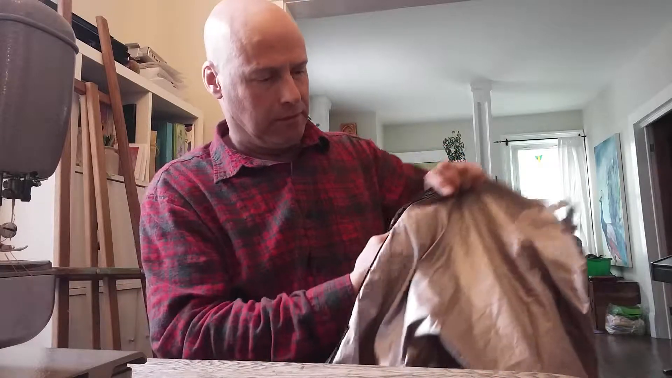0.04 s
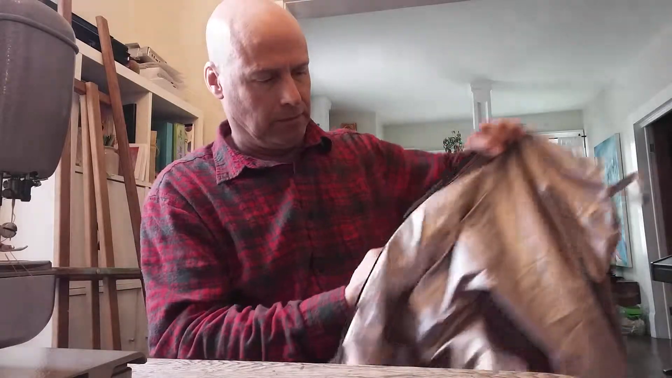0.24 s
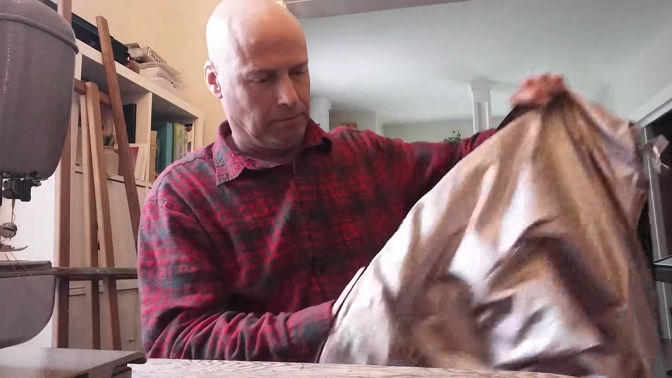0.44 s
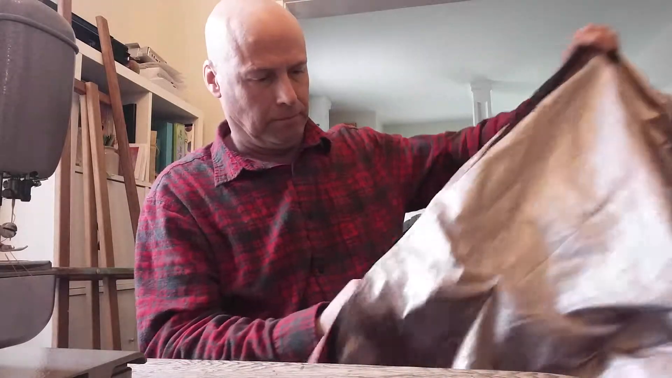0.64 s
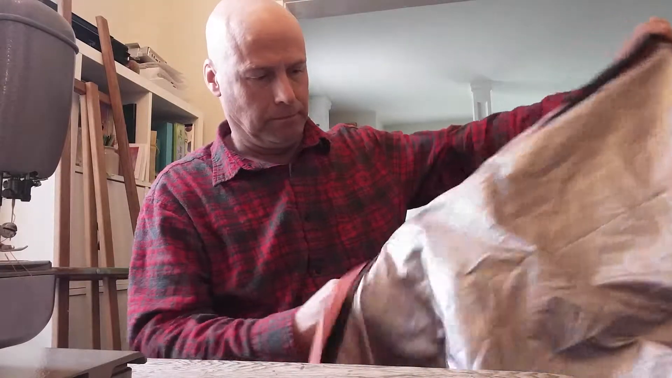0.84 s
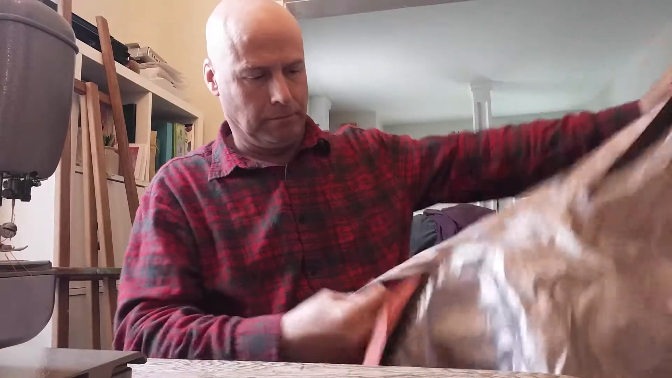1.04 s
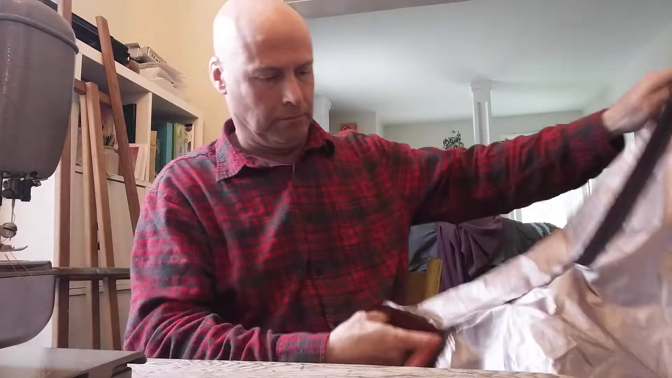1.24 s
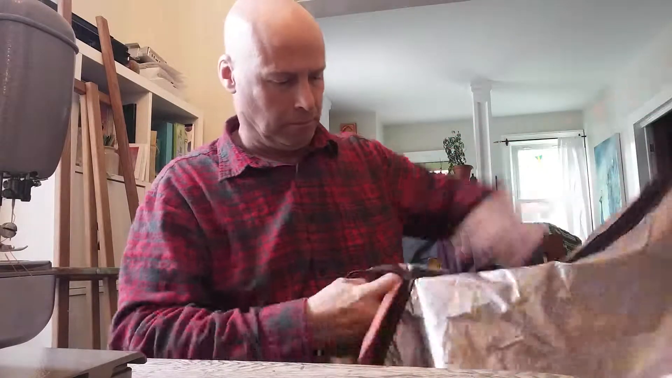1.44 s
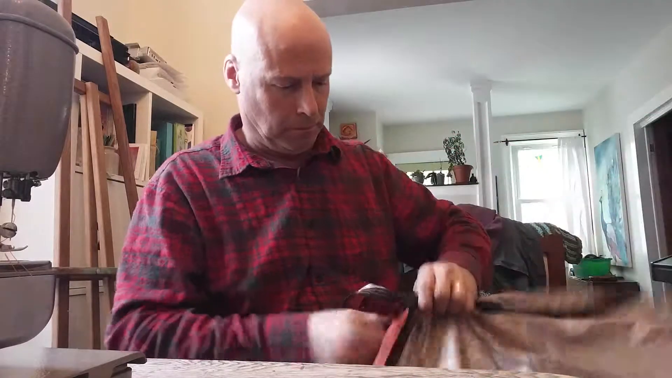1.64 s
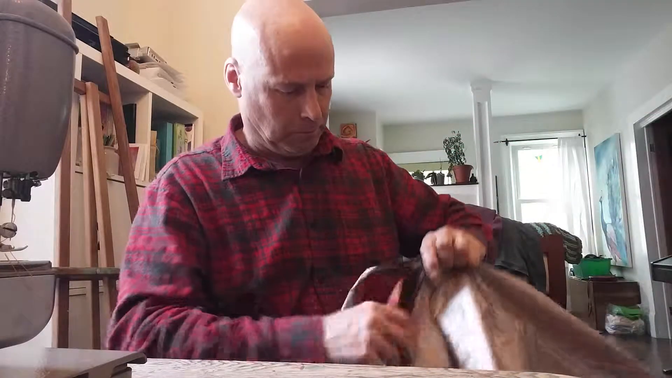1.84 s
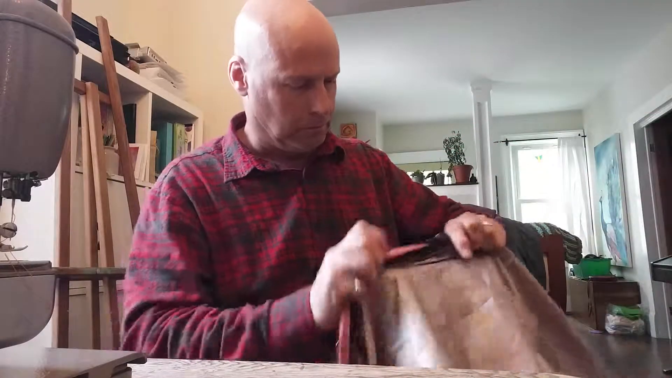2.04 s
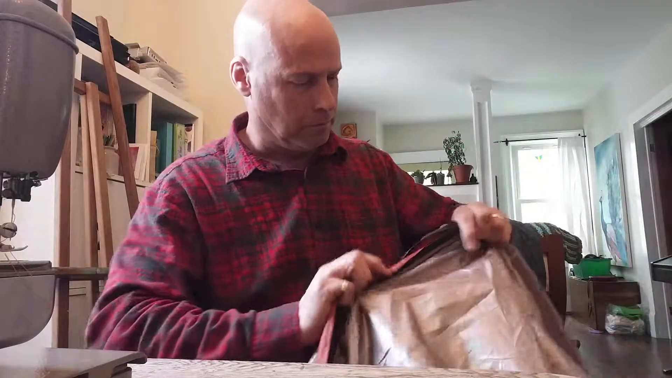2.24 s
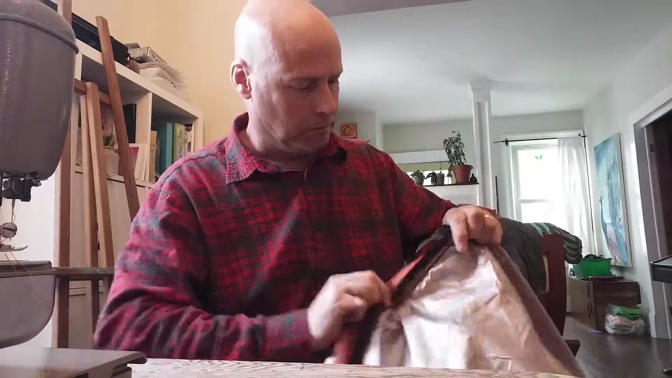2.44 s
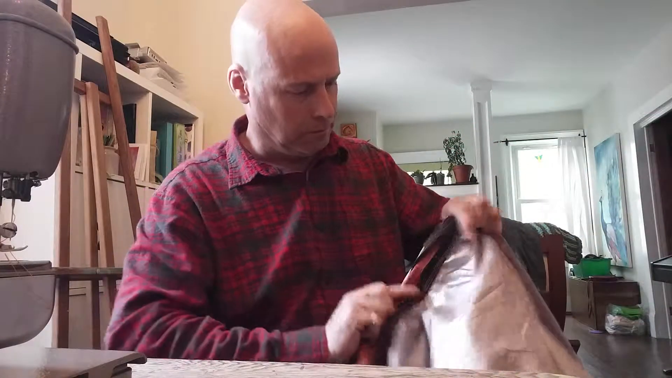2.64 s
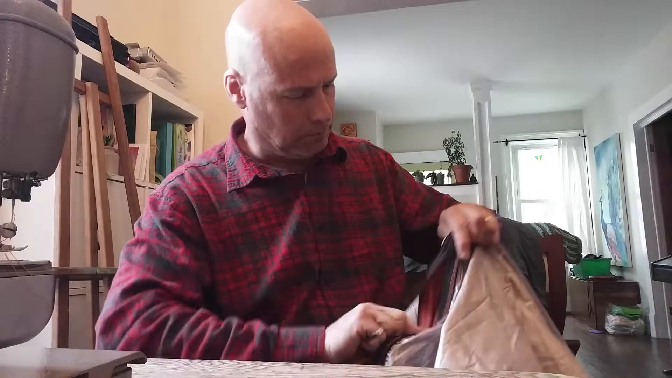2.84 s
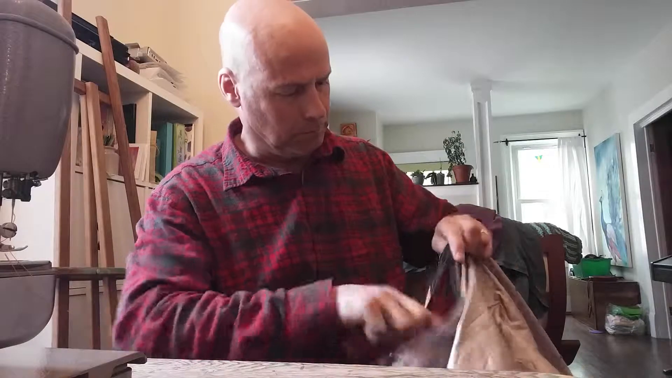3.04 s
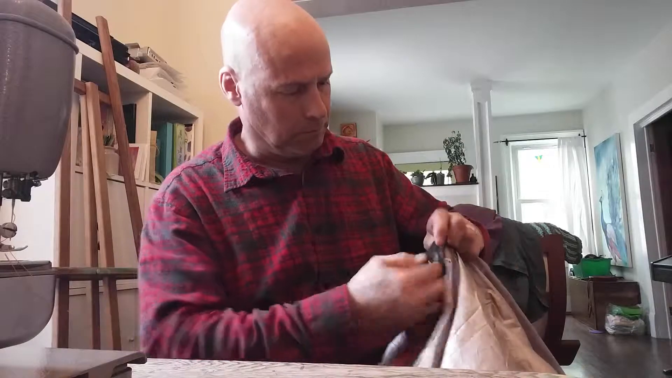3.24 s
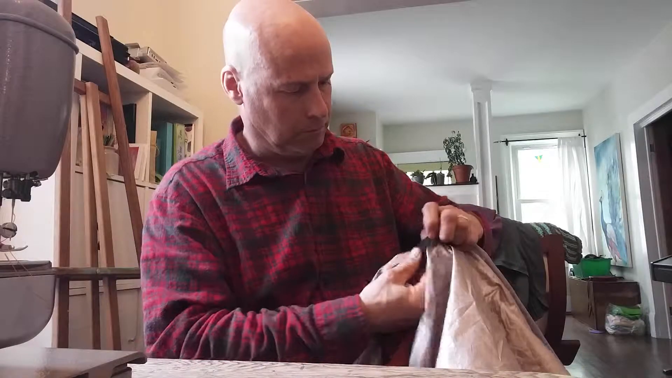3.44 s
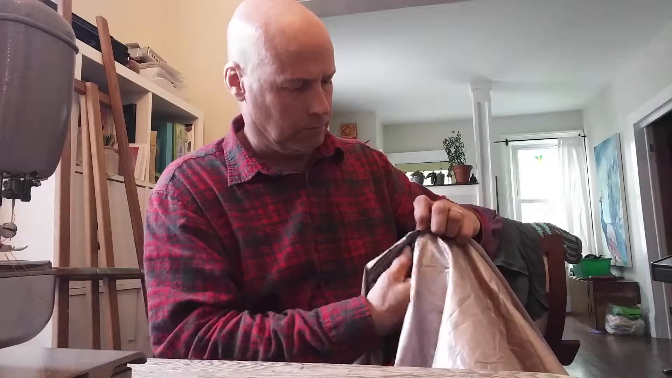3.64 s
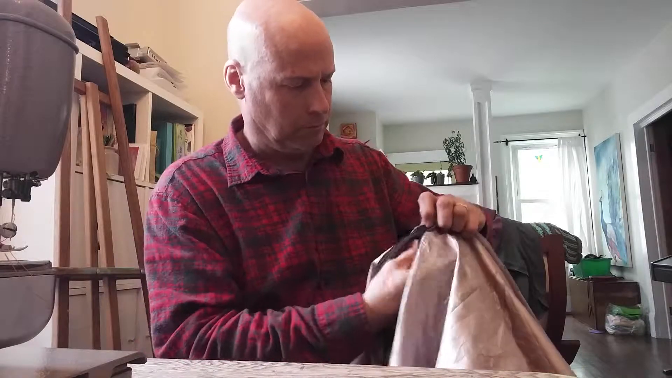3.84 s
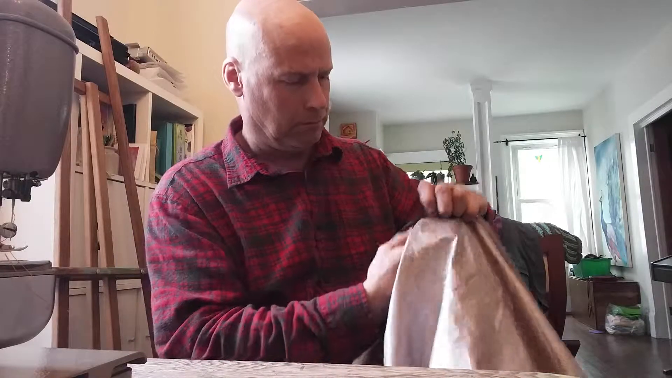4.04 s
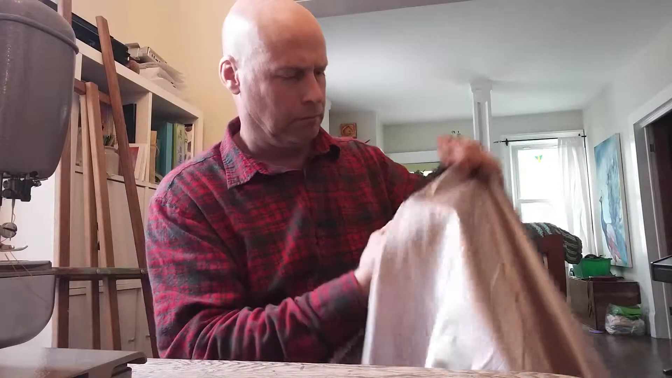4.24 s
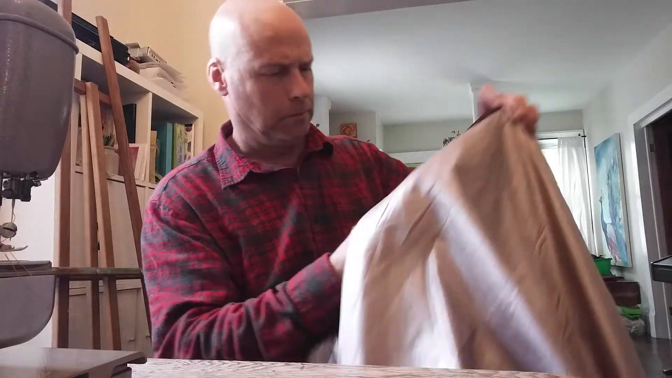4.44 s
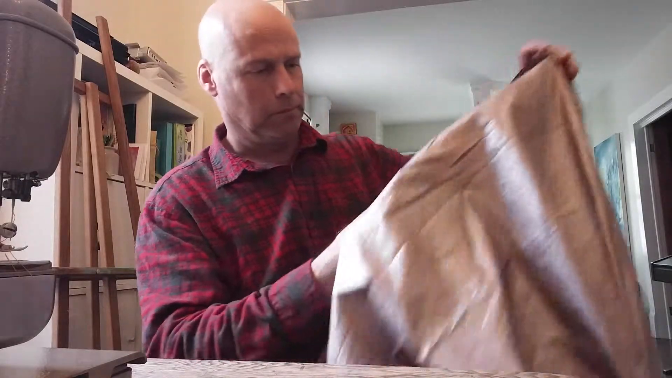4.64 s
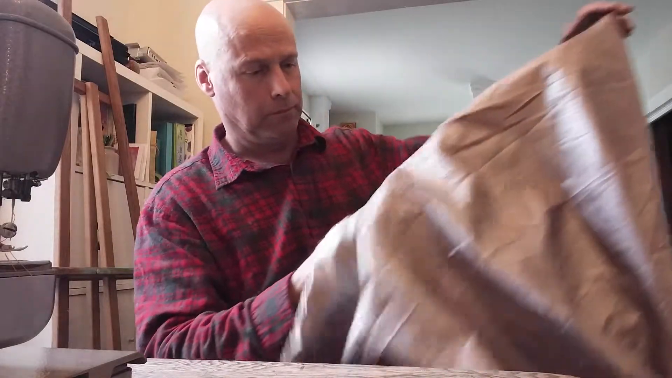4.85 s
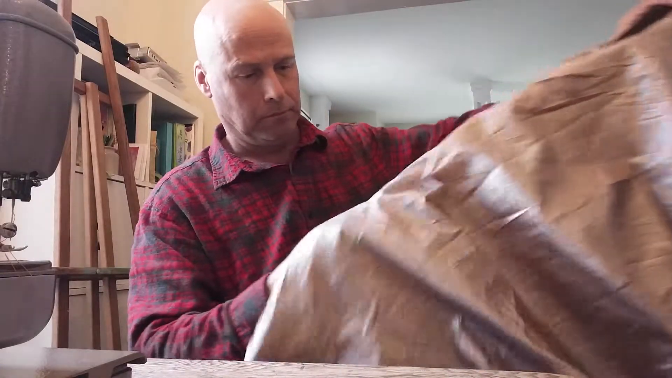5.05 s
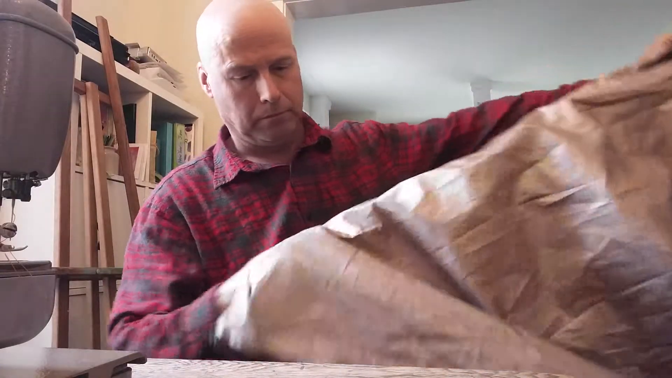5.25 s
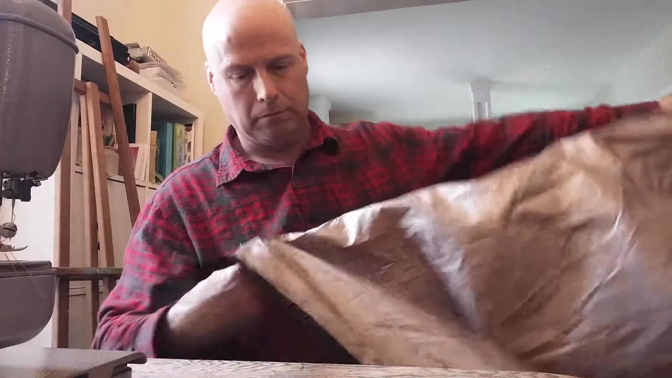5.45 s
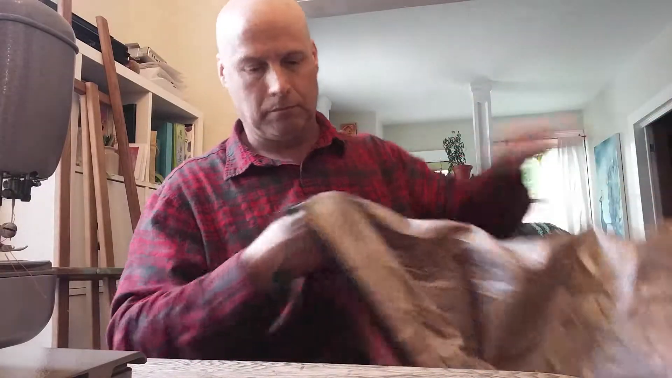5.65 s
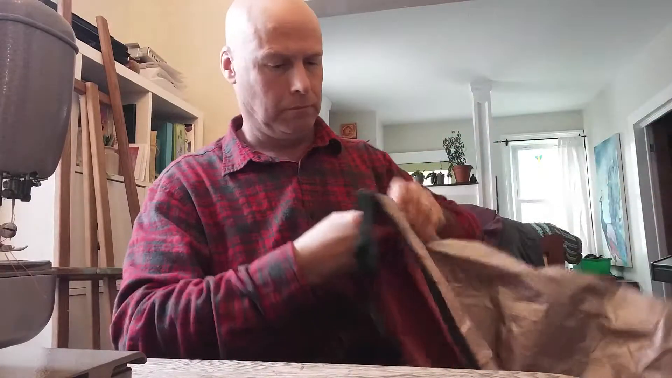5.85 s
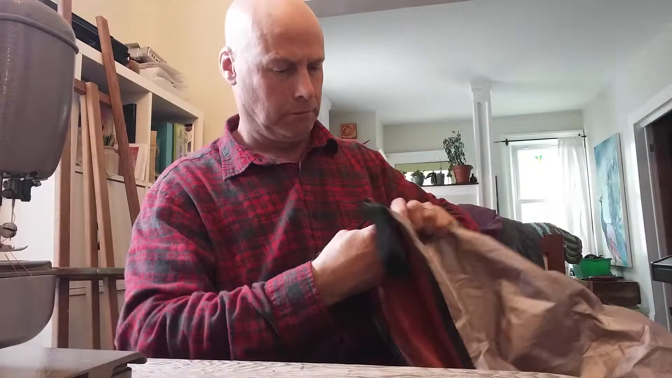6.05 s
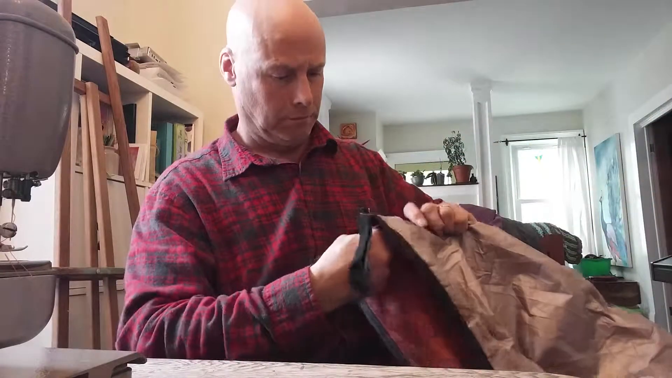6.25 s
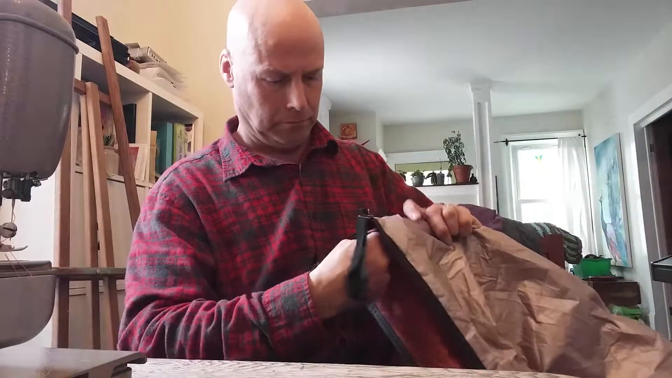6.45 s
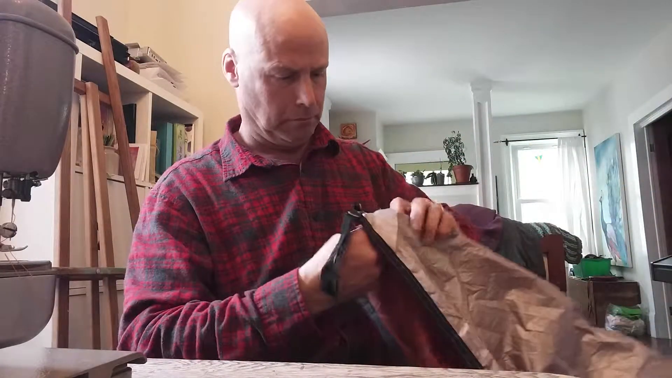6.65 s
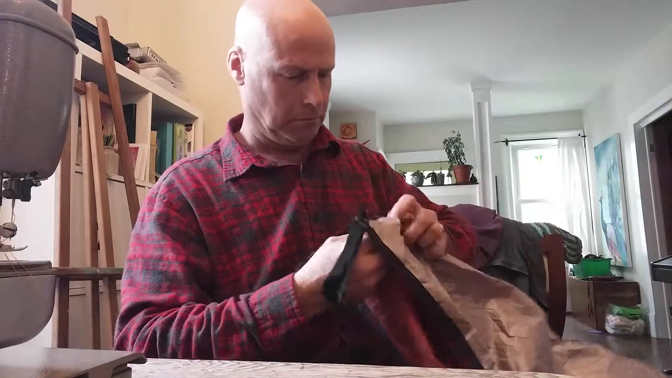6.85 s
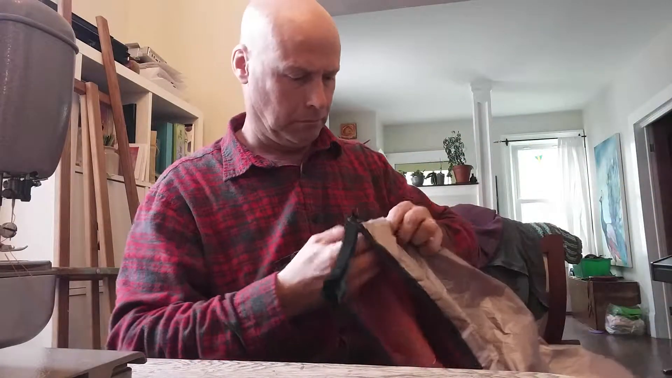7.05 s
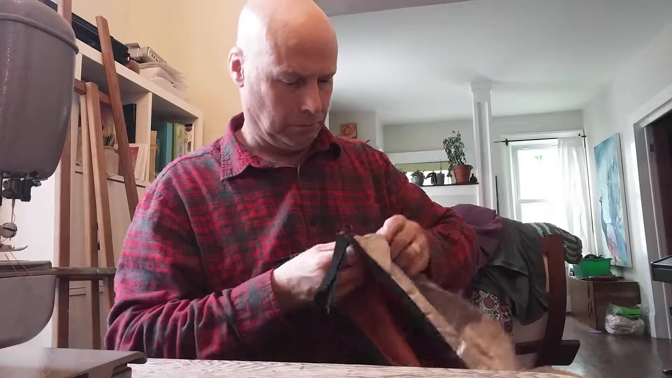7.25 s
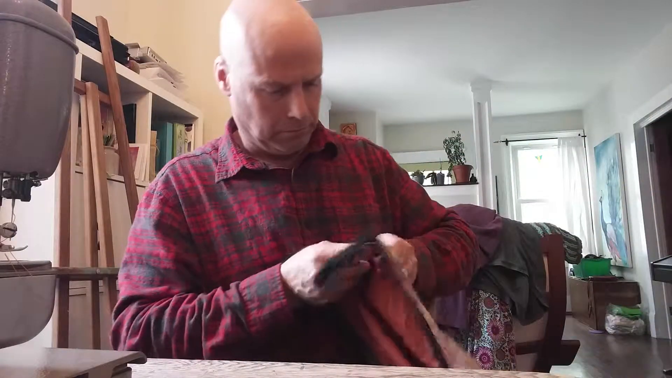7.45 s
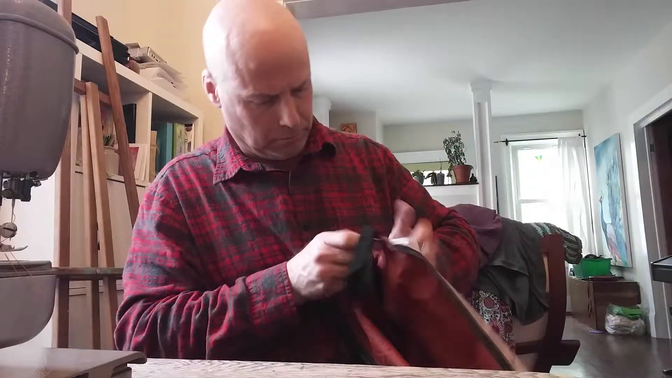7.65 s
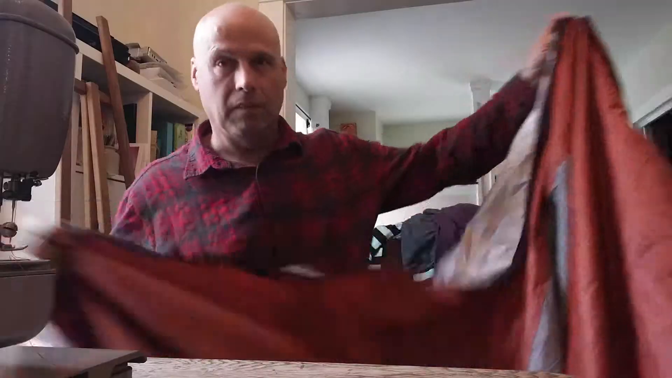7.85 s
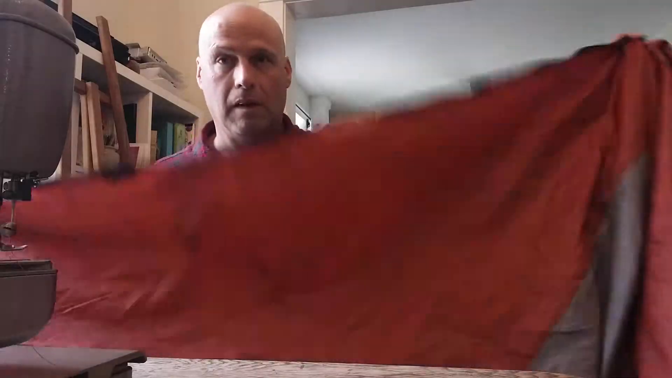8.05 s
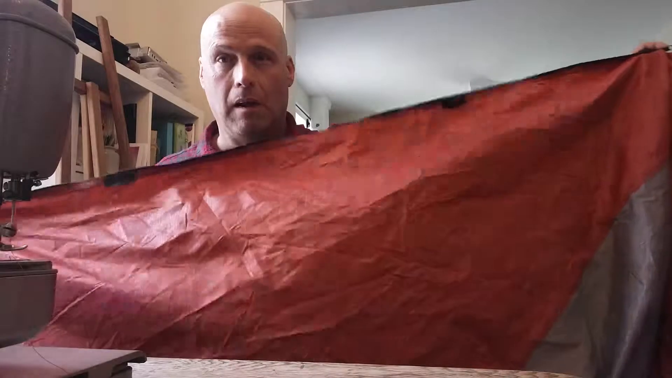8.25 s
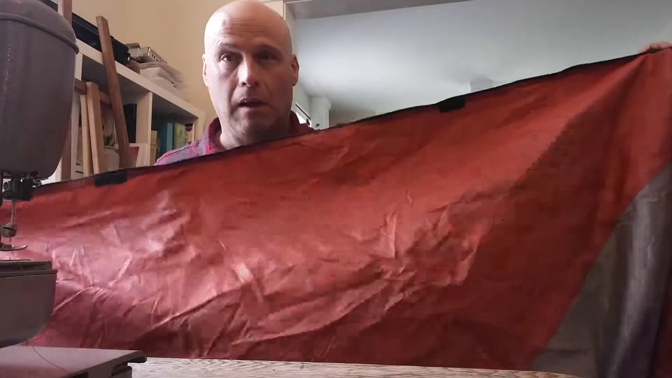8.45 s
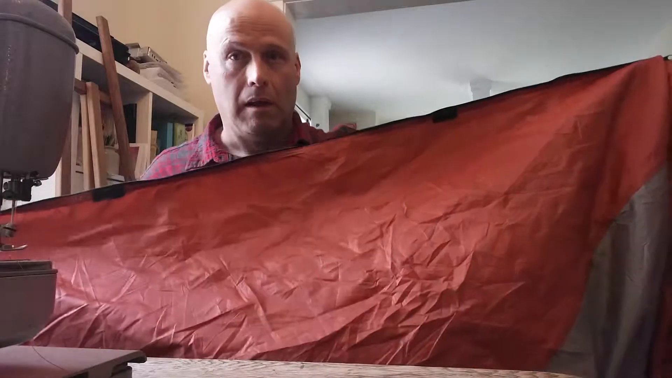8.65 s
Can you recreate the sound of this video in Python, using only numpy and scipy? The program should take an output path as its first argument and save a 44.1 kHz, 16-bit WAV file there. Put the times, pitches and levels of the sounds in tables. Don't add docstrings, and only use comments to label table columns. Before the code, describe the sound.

Stiff coated tent fabric is handled very near a stereo microphone indoors. A quick raspy zip runs through the cloth, followed by crisp folding, low soft knocks and puffs of air. Another zip starts lower, speeds up and slows, with loud ticks and fabric snaps. Smaller rustles follow, then sudden silence and a quiet return with a few tiny ticks.

```python
import sys
import numpy as np
from scipy import signal
from scipy.fft import rfft, irfft, next_fast_len
from scipy.io import wavfile
from scipy.ndimage import uniform_filter1d

SR = 44100
rng = np.random.default_rng(int(sys.argv[2]) if len(sys.argv) > 2 else 0)


def gain_from_db(level_db):
    decades = np.asarray(level_db, float) / 20
    return 10 ** decades


def file_out(sig):
    cols = np.atleast_2d(sig).T
    lim = np.clip(cols, -1, 1)
    pcm = np.round(lim * 32767).astype(np.int16)
    wavfile.write(sys.argv[1], SR, pcm)


N = 383669
FULL_DB = -38


def zipper_pulls():
    # (time [s], tooth rate [Hz], octave [dB], fundamental [dB], third partial [dB])
    first_pull = [
        [(0.17, 408.5, -64, -42, -54), (0.206, 385, -52, -48.5, -64), (0.238, 349.3, -55, -45.5, -63),
         (0.274, 402, -49.5, -67.5, -72), (0.29, 404, -55, -45, -71.5), (0.314, 395.4, -53, -46.5, -65),
         (0.342, 412, -46.5, -51.5, -59.5), (0.392, 317, -48.5, -72.5, -44.5), (0.4, 327, -44, -60.5, -48)],
        [(0.4, 341.3, -34, -67.5, -58), (0.418, 373.7, -39, -45.5, -45.5), (0.466, 428, -34, -44, -36),
         (0.516, 430, -35, -36, -49), (0.55, 394.3, -41.5, -56.5, -43), (0.616, 402.3, -32.5, -47.5, -51),
         (0.66, 391.7, -40, -36.5, -55.5), (0.678, 445, -30, -40.5, -39.5), (0.7, 526, -32, -55.5, -45.5)],
        [(0.7, 540, -35.5, -47.5, -48.5), (0.728, 562.3, -30, -34, -43), (0.756, 574.3, -38.5, -36.5, -39.5),
         (0.776, 508, -46, -57, -40.5), (0.79, 464.3, -35, -46.5, -34.5), (0.812, 461.5, -36.5, -36.5, -40),
         (0.88, 367.3, -32.5, -60, -44), (0.92, 319.8, -37.5, -49.5, -40.5), (0.95, 335.2, -41.5, -37.5, -42.5)],
        [(0.95, 342.4, -42, -35, -40.5), (0.974, 348.2, -38.5, -65, -48), (0.998, 347.7, -26, -58, -38.5),
         (1.022, 330, -37, -61, -36.5), (1.044, 340.4, -36, -59.5, -44.5), (1.082, 454, -33.5, -44, -49.5),
         (1.114, 350.8, -50, -45.5, -50.5), (1.15, 378, -53.5, -48, -66), (1.17, 372, -43, -63, -54)],
    ]
    second_pull = [
        [(4.34, 155.4, -52, -58.5, -69), (4.368, 194.3, -67, -55, -48.5), (4.446, 310, -40, -50.5, -43.5),
         (4.508, 367.8, -36.5, -34, -45), (4.542, 387.4, -38.5, -40, -52), (4.602, 386, -34, -40.5, -49),
         (4.614, 414, -38.5, -37.5, -63), (4.628, 444, -30, -48, -45), (4.65, 450, -33.5, -46, -41.5)],
        [(4.65, 444, -30.5, -55, -47), (4.714, 455, -35.5, -33, -51), (4.74, 487.4, -37.5, -53, -52),
         (4.792, 419, -31.5, -41, -62.5), (4.848, 459.8, -37, -44, -46.5), (4.876, 429.1, -36.5, -46.5, -50.5),
         (4.91, 424.6, -48, -39, -45), (4.954, 478, -38, -33, -63), (5.0, 523, -32, -41.5, -46)],
        [(5.0, 518, -33.5, -47, -43.5), (5.008, 536, -27, -36.5, -54), (5.022, 538.6, -30, -32.5, -48),
         (5.044, 555, -40.5, -39, -39), (5.146, 493.8, -32, -41, -44), (5.18, 456, -33, -33.5, -40),
         (5.204, 431, -30, -45.5, -41), (5.27, 481, -39.5, -34, -50), (5.32, 424.3, -27.5, -37, -45.5)],
        [(5.32, 435, -33, -37.5, -49.5), (5.362, 494.7, -35, -37, -48), (5.424, 415.8, -36, -34, -43),
         (5.496, 452.6, -39.5, -42.5, -46.5), (5.536, 469, -33.5, -33.5, -47.5),
         (5.55, 469.2, -32, -34.5, -42.5), (5.58, 351, -35, -42.5, -53.5), (5.598, 302.6, -37, -43, -50),
         (5.65, 267.2, -51, -42, -52.5)],
    ]
    pulls = np.zeros((3, N))
    for strokes, chatter_db in [(first_pull, -54.5), (second_pull, -55)]:
        add(pulls, *slider_run(np.vstack(strokes), chatter_db))
    return pulls


def slider_run(rows, chatter_db, jitter=0.021, flutter_db=2.2):
    chatter_partials = [4.0, 6.5, 0.0, 1.0, -2.0]
    s, *columns = np.transpose(rows)
    t = np.arange(s[0], s[-1], 1 / SR)
    hz, octave_db, low_db, third_db = (np.interp(t, s, c) for c in columns)
    turns = np.cumsum(hz * (1 + jitter * wander(len(t), 139.8))) / SR

    upper_db = chatter_db + 0.3 * (octave_db - FULL_DB)
    upper_db = upper_db - 7 * np.log2(hz / 300)
    upper_db = upper_db - 220 * np.clip(hz / 374 - 1, 0, .035)
    partials_db = [low_db + 0.5, octave_db + 0.5, third_db + 0.5, third_db - 8]
    partials_db += [upper_db + db for db in chatter_partials]

    buzz = 0
    for n, db in enumerate(partials_db, 1):
        dip_db = -5.0 * np.exp(-((n * hz - 512) / 40) ** 2)
        dip_db -= 14 * np.clip(n * hz / 2300 - 1, 0, 1)
        drift = np.array([0 * t, 1.42 * wander(len(t), 19)])
        catch = wander(len(t), 70) + 0.2 * wander(len(t), 18)
        gain = gain_from_db(db + dip_db + flutter_db * catch)
        buzz = buzz + gain * np.cos(2 * np.pi * n * turns + (n - 1) ** 2 + drift)
    beat = np.cos(2 * np.pi * turns)
    return s[0], signal.windows.tukey(len(t), .08) * np.vstack([np.sqrt(2) * buzz, beat])


def cloth():
    # (frequency [Hz], density [dB per Hz])
    body_colour = [(110, -48.5), (180, -10), (274, -4.5), (355, 4), (398, 3.5), (429, -4), (458, 1.5),
                   (490, -10), (528, -15), (568, 1), (654, 4), (1300, -7), (1690, -11.5), (2860, -120)]
    crease_colour = [(700, -43.5), (1100, -8), (1500, -4.5), (2000, -3), (2800, -7.5), (3400, -11.5),
                     (5000, -25)]
    hiss_colour = [(1650, -34.5), (2800, -4), (5040, -1), (7260, 3), (7910, -5.5), (8430, -2), (11000, -9),
                   (15500, -15)]
    air_colour = [(15, -57.5), (30, -24.5), (45, -10.5), (65, -1), (120, -2), (180, -3), (260, -2),
                  (400, -41)]
    hiss_gain, dull_gain, body_gain, crease_gain, air_gain = cloth_levels()
    clumps = wander(N, 6.3)
    body = crinkle(body_colour, 500, 1.0, 5.0, 0.6, 60, clumps)
    crease = crinkle(crease_colour, 500, 2.6, 5.5, 0.7, 60, clumps)
    hiss = crinkle(hiss_colour, 900, 7.0, 11.0, 0.6, 150, clumps)
    air = crinkle(air_colour, 140, 2.0, 3.1, 0.86, 30, clumps)

    dull = signal.lfilter(*signal.butter(2, 5600, fs=SR), hiss)
    sharp = hiss - dull
    dull_part = dull_gain * dull * gain_from_db(1.3 * wander(N, 16))
    sharp_part = hiss_gain * sharp * gain_from_db(.9 * wander(N, 12))
    return body_gain * body + air_gain * air, crease_gain * crease + dull_part + sharp_part


def crinkle(points, per_s, spread_db, slide_db, flicker_db, flicker_hz, clumps):
    buckles = gain_from_db(spread_db * np.minimum(rng.exponential(1, N), 2.6))
    buckles = buckles * (rng.random(N) < per_s / SR)
    grain = np.sqrt(abs(uniform_filter1d(buckles ** 2, 24)))
    drive = (evened(grain) + gain_from_db(slide_db)) * rng.standard_normal((2, N))
    drive = drive * gain_from_db(flicker_db * (clumps + wander(N, flicker_hz)))
    return evened(coloured(drive, points))


def cloth_levels():
    # (time [s], effort [dB])
    handling = [(0.11, -59.5), (0.22, -49.5), (0.46, -39.5), (0.9, -37), (1.11, -40.5), (1.14, -47),
                (1.54, -54), (3.98, -62), (4.23, -55.5), (4.47, -40.5), (4.67, -37.5), (5.45, -39.5),
                (5.62, -42.5), (5.67, -46.5), (5.95, -47.5), (6.5, -58), (7.3, -57.5), (8.7, -53.5)]
    # (time [s], strength [dB], fade [s], weight of fold over hiss [dB])
    grabs = [(0, -43, 0.085, -4), (0.218, -64, 0.22, 18.5), (.6, -50, 0.047, 12), (.46, -44, .08, -9.5),
             (.53, -50.5, 0.058, 2), (.79, -44.5, .07, 0), (.71, -36.5, 0.093, -7.5),
             (1.178, -35.5, 0.14, -6.5), (1.609, -51.5, .08, 5), (1.723, -38.5, 0.22, 2),
             (2.062, -54.5, 0.083, 9.5), (2.095, -47, 0.12, -1.5), (2.54, -46.5, 0.39, -2),
             (2.589, -39, 0.022, -13.5), (2.899, -42.5, 0.09, -8), (2.774, -45, 0.055, -17),
             (3.02, -44.5, 0.15, -0.5), (3.148, -45, 0.38, -4.5), (3.41, -48.5, 0.31, -4),
             (3.537, -43, 0.34, -4), (3.82, -48, 0.29, -8.5), (3.69, -43, .03, -16),
             (4.02, -48.5, 0.34, -9.5), (5, -37.5, 0.036, 2), (5.06, -37, 0.18, -3),
             (5.19, -34.5, 0.07, 1.5), (5.3, -46.5, 0.08, 2), (5.691, -41.5, 0.065, -1.5),
             (5.995, -41.5, 0.15, 0), (6.558, -48, 0.059, -22), (6.69, -47.5, .08, -24),
             (6.785, -50, 0.086, -23), (6.95, -46, 0.12, -3), (7.04, -45, 0.11, -6),
             (7.262, -50, 0.03, -21), (7.429, -45.5, 0.13, -0.5), (7.6, -48, .12, 0),
             (8.5, -60.5, 0.092, 13), (8.621, -55, 0.021, -20), (8.652, -46, 0.028, -33)]
    # (time [s], strength [dB], build [s], weight [dB])
    sweeps = [(1.109, -40.5, 0.18, 5.5), (1.89, -42, 0.26, 0), (2.175, -38.5, 0.072, -1),
              (2.39, -46, 0.29, -2.5), (2.85, -53, 1, 0.5), (4.34, -45.5, 0.039, 0), (4.67, -58, 0.091, 19),
              (5.49, -44, 0.084, 0), (5.63, -42, 0.11, 3.5), (5.9, -50.5, 0.51, 7), (6.11, -42, 0.22, 1),
              (6.358, -43, 0.21, -2.5), (6.8, -47, 0.24, -9), (7.39, -48, 0.58, -6.5),
              (7.73, -40.5, 0.21, -9.5), (7.8, -41.5, 0.11, -10), (8.684, -55.5, 0.18, -42)]
    # (time [s], strength [dB], fade [s])
    flaps = [(.62, -81, 0.22), (1.151, -53.5, 0.34), (1.72, -47.5, 0.17), (2.15, -56.5, 0.32),
             (2.65, -73, .2), (3.05, -60, 0.39), (3.54, -59, 0.45), (4.34, -54.5, 0.099),
             (4.67, -57.5, 0.36), (5.03, -56, 0.096), (5.14, -49.5, 0.19), (5.26, -60.5, 0.11),
             (5.44, -53, 0.13), (5.67, -51.5, 0.049), (5.9, -53.5, 0.47), (6.41, -55.5, 0.19),
             (7, -60, 0.62), (7.35, -59.5, .2), (7.449, -61.5, .6), (7.75, -58, 0.18), (8.5, -60.5, .3)]
    t = np.arange(0, N + 64, 64) / SR
    effort = np.interp(t, *np.transpose(handling)) - FULL_DB
    moves = [(s, db, w, min(0.038, 0.24 * fade), fade) for s, db, fade, w in grabs]
    moves += [(s, db, w, build, 0.1) for s, db, build, w in sweeps]

    def moved(offset_db, share):
        return gestures([(s, db + offset_db + share * w, rise, fall) for s, db, w, rise, fall in moves])

    hiss = gain_from_db(FULL_DB + effort) ** 2 + moved(0, 0)
    dull = gain_from_db(FULL_DB + 3.0 + 1.08 * effort) ** 2 + moved(2.5, .4)
    body = gain_from_db(-42.5 + 0.62 * effort) ** 2 + moved(0, 1)
    crease = gain_from_db(-41.5 + 1.09 * effort) ** 2 + moved(-4, 0.27)
    air = gain_from_db(-61 + 0.19 * effort) ** 2 + gestures([(s, db, .06, fade) for s, db, fade in flaps])
    return [np.interp(np.arange(N) / SR, t, np.sqrt(p)) for p in (hiss, dull, body, crease, air)]


def gestures(rows):
    t = np.arange(0, N + 64, 64) / SR
    s, db, rise, fall = np.transpose(rows)[..., None]
    away = np.maximum((s - t) / np.maximum(rise, .005), (t - s) / np.maximum(fall, .005))
    return (gain_from_db(db - 14.5 * away) ** 2).sum(0)


def fold_pops(out):
    # (time [s], crease level [dB], fold level [dB], crease frequency [Hz])
    fold_events = [(.0327, -38, -46, 1900), (.7304, -33, -33, 1700), (.9892, -38, -31, 1380),
                   (1.1753, -35, -48, 2820), (1.712, -36, -38, 1720), (1.7993, -36, -55, 2000),
                   (1.8603, -31, -38, 1950), (1.9458, -38, -31, 1300), (2.0562, -35, -32, 1580),
                   (2.1663, -31, -35, 1600), (2.1894, -32, -39, 1400), (2.3585, -33, -48, 1500),
                   (2.5317, -32, -46, 2460), (2.5516, -39, -36, 1330), (2.5877, -35, -57, 2500),
                   (2.912, -39, -49, 2670), (3.2442, -41, -46, 2240), (3.39, -39, -40, 1570),
                   (3.4137, -38, -47, 1490), (3.5318, -35, -34, 2050), (3.6452, -32, -42, 2200),
                   (4.1586, -46, -42, 1380), (5.0017, -27, -39, 1610), (5.6836, -23, -25, 1600),
                   (6.4367, -37, -42, 2040), (6.7811, -38, -34, 1800), (6.8856, -42, -61, 2050),
                   (6.9224, -44, -41, 1400), (6.9529, -31, -41, 1850), (6.964, -33, -48, 2100)]
    for (s, crease_db, fold_db, hz), u in zip(fold_events, rng.random((len(fold_events), 2))):
        pop = gain_from_db(crease_db) * ping(hz, .0001, 0.005)
        pop += gain_from_db(crease_db - 4) * ping(3100 + 900 * u[0], .0001, .003)
        pop -= gain_from_db(fold_db) * ping(700 + 300 * u[1], 0.00017, 0.014)
        add(out, s, gain_from_db([[1.3], [-1.3]]) * pop)


def surface_ticks(out):
    # (time [s], level [dB], frequency [Hz], left-right [dB])
    tick_events = [(.0327, -31, 4600, 3), (.7304, -20, 6100, 1), (.9892, -22, 6700, 4),
                   (1.1753, -29, 7100, 8), (1.712, -32, 7200, 2), (1.728, -30, 5800, 5),
                   (1.7993, -34, 6500, 2), (2.1894, -31, 7000, 4), (2.5317, -36, 5600, 4),
                   (2.5877, -35, 6300, 3), (2.6088, -26, 5800, 6), (3.39, -40, 6200, 4),
                   (3.4231, -39, 5800, 4), (3.6452, -33, 5800, 2), (4.0244, -39, 6600, 4),
                   (4.9904, -12.5, 6200, 4), (5.0017, -31, 6000, 1), (5.6356, -26, 6400, 7),
                   (5.6836, -19.5, 7600, 4), (5.7512, -32, 7400, 8), (5.9916, -30, 7100, 8),
                   (6.3554, -33, 7000, 8), (6.4367, -40, 5900, 4), (6.8856, -25.5, 4900, 5),
                   (6.964, -34, 8000, 2), (7.0524, -39, 7600, 3), (8.6203, -32.5, 7500, 1),
                   (8.6511, -38, 7300, 3), (8.6688, -38, 6000, 2), (8.6841, -38, 6500, 2)]
    for s, db, hz, pan_db in tick_events:
        tick = ping(hz, .00011, .0014)
        tick += gain_from_db(-14) * ping(.74 * hz, .0003, .008)
        tick += gain_from_db(-9) * np.roll(ping(1.15 * hz, .00011, .003), round(.0012 * SR))
        add(out, s, panned(pan_db) * gain_from_db(db) * tick)


def cloth_knocks(out):
    # (time [s], level [dB], frequency [Hz])
    knock_events = [(1.248, -33, 701), (1.366, -33.5, 850), (1.563, -35, 630), (1.593, -36, 624),
                    (1.702, -43, 649), (1.707, -28, 726), (1.945, -28.5, 726), (2.055, -29, 589),
                    (2.123, -41, 641), (2.165, -39, 662), (2.311, -35, 780), (2.368, -37, 781),
                    (2.53, -47, 716), (2.549, -32.5, 692), (2.589, -40, 743), (2.635, -32.5, 697),
                    (2.709, -34, 756), (2.745, -40, 735), (2.762, -36, 921), (2.775, -35, 751),
                    (3.008, -43, 900), (3.026, -40, 692), (3.389, -35, 708), (3.482, -50, 660),
                    (3.51, -37, 770), (3.531, -37, 890), (3.584, -33, 651), (3.864, -37.5, 774),
                    (4.124, -47, 619), (4.158, -38, 646),
                    (5.746, -36, 696), (5.821, -37, 720), (5.846, -35, 660), (5.931, -37, 668),
                   (5.997, -38, 643), (6.073, -28, 869), (6.294, -33, 643), (6.319, -33, 716),
                   (6.436, -38, 837), (6.548, -46, 600), (6.763, -37, 786), (6.78, -42, 860),
                   (6.921, -36, 668), (6.944, -35, 585), (7.05, -32, 780), (7.151, -43, 654),
                   (7.351, -40, 716), (7.69, -37, 1060), (7.748, -31.5, 780), (7.772, -33, 756)]
    for s, db, hz in knock_events:
        add(out, s, gain_from_db(db - 5.0) * ping(hz, .0006, .02) * [[-1], [-1]])


def coating_crackles(out):
    # (time [s], level [dB], frequency [Hz], left-right [dB])
    crackle_events = [(1.5224, -47, 1520, 5), (1.5844, -45, 1790, 1.5), (2.547, -42, 1700, 2.5),
                      (2.5928, -31, 3700, 1), (2.5954, -27.5, 7100, 4.0), (2.7644, -40, 7380, 5.0),
                      (2.9044, -34, 8400, 7), (3.018, -38, 1870, 3.5), (3.0624, -48, 7290, 2.0),
                      (4.0144, -38, 6990, 4.5), (6.0724, -32, 6550, 1), (7.1758, -38, 5200, 3.0),
                      (7.403, -36, 1510, 3.5), (1.0855, -24, 3500, 2), (5.123, -27, 4000, 3),
                      (5.1974, -25.5, 1700, 1.5), (5.2055, -27.5, 4100, 3), (5.2948, -26, 3500, 6),
                      (3.6545, -47, 1900, 2), (3.683, -41, 2100, -4), (6.945, -37, 1800, 2),
                      (6.973, -38, 2600, 2), (7.053, -39, 1800, 2), (2.76, -41, 1890, 2),
                      (4.135, -43, 1740, 2)]
    for s, db, hz, pan_db in crackle_events:
        add(out, s, panned(pan_db) * gain_from_db(db - 1.5) * ping(hz, .0001, 0.0037))


def pull_tab(out):
    # (frequency [Hz], level [dB], decay by 60 dB [s])
    tab_modes = [
        (7440, -42, .35),
        (13460, -45, .3),
        (13900, -48, .2),
        (5530, -52, .2),
    ]
    t = np.arange(15000) / SR
    for hz, db, t60 in tab_modes:
        gain = gain_from_db(db - 60 * t / t60 + 1.7 * wander(len(t), 80))
        add(out, 1.172, gain * np.sin(2 * np.pi * hz * t) * [[1.3], [.7]])


def snaps():
    out = np.zeros((2, N))
    for source in (fold_pops, surface_ticks, cloth_knocks, coating_crackles, pull_tab):
        source(out)
    return out


def ping(hz, rise_s, t60):
    t = np.arange(1500) / SR
    ring = (1 - np.exp(-t / rise_s)) ** 2 * gain_from_db(-60 * t / t60) * np.sin(2 * np.pi * hz * t)
    return ring / abs(ring).max()


def scatter(t60, start_s):
    taps = np.zeros(8000)
    at = np.arange(0, 7980, 20) + rng.integers(0, 20, 399)
    taps[at] = rng.choice([-1., 1.], 399)
    taps = np.roll(taps * gain_from_db(-60 * np.arange(8000) / SR / t60), round(start_s * SR))
    return taps / np.linalg.norm(taps)


def echoed(x, t60, start_s):
    return signal.oaconvolve(x, scatter(t60, start_s))[:N]


def port_pair(paths):
    # (frequency [Hz], coherence [0-1])
    likeness = [(40, 0), (80, 0.4), (150, 0.5), (300, 0.7), (600, 0.73), (1200, 0.8), (2400, 0), (4000, 0),
                (15000, 0.3)]
    # (frequency [Hz], left-right [dB])
    balance = [(40, -8.5), (80, 1.5), (150, -4), (300, -1.5), (700, 2), (2400, 0.5), (4400, 0), (6000, 2.5),
               (8000, 13), (12000, 0), (15000, 4.5)]
    # (frequency [Hz], phase [rad])
    left_lead = [(60, 2.4), (260, 0.71), (500, 0.51), (1000, 0.91), (2000, 1.28), (4300, 1.7),
                 (10000, 5.05)]
    size = next_fast_len(N)
    hz = np.fft.rfftfreq(size, 1 / SR)
    same = np.clip(read(likeness, hz), 0, 1)
    lean = gain_from_db(read(balance, hz) / 2)
    a, b = rfft(paths, size)
    right = (same * a + np.sqrt(1 - same ** 2) * b) * np.exp(-1j * read(left_lead, hz))
    return irfft(np.array([a * lean, right / lean]), size)[:, :N]


def panned(pan_db):
    return gain_from_db([[pan_db / 2], [-pan_db / 2]])


def coloured(x, points):
    log_gain = np.log(gain_from_db(np.maximum(read(points, abs(np.fft.fftfreq(8192, 1 / SR))), -100)))
    taps = np.fft.ifft(np.exp(np.conj(signal.hilbert(log_gain)))).real[:4096]
    return signal.oaconvolve(x, taps[None], axes=1)[:, :N]


def wander(length, hz):
    span = max(round(SR / hz / 2), 1)
    return evened(uniform_filter1d(uniform_filter1d(rng.standard_normal(length), span), span))


def evened(x):
    return x / np.sqrt(np.mean(x ** 2) + 1e-20)


def read(points, hz):
    f, value = np.transpose(points)
    return np.interp(np.log(hz + 1), np.log(f + 1), value)


def add(mix, s, sound):
    part = mix[..., round(s * SR):][..., :sound.shape[-1]]
    part += sound[..., :part.shape[-1]]


def scene():
    *buzz_paths, beat = zipper_pulls()
    buzz = np.array([x + gain_from_db(-8.0) * echoed(x, 0.5, 0.003836) for x in buzz_paths])
    body, bright = cloth()
    shaken = bright * (1 + .05 * beat)
    sharp = snaps()
    room = np.array([echoed(sharp.mean(0), 0.12, 0.0029) for _ in range(2)])
    return port_pair(buzz + body + shaken) + sharp + gain_from_db(-5.5) * room


def top_cut(x):
    return signal.sosfilt(signal.butter(12, 16800, fs=SR, output="sos"), x)


def record(dry):
    # (time [s], gain [dB])
    mute_gain = [
        (7.8045, 1),
        (7.807, -38),
        (7.825, -41),
        (7.874, -41),
        (7.88, -90),
        (8.335, -82),
        (8.339, -14),
        (8.37, -4),
        (8.45, -5.5),
        (8.7, -0.5),
    ]
    s, db = np.transpose(mute_gain)
    limited = signal.oaconvolve(dry, signal.firwin(401, 15700, fs=SR)[None], "same")
    return top_cut(limited * gain_from_db(np.interp(np.arange(N) / SR, s, db)))


dry = scene()
out = record(dry)
file_out(out)
```